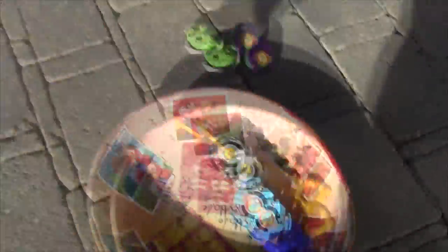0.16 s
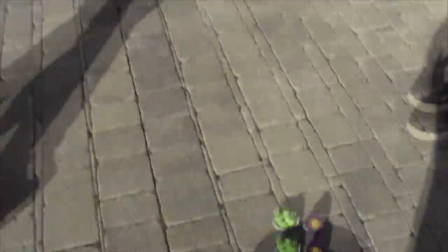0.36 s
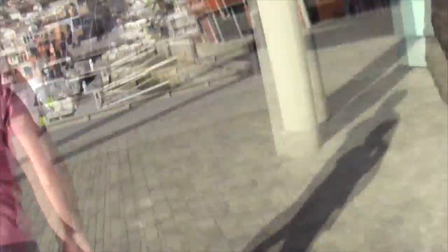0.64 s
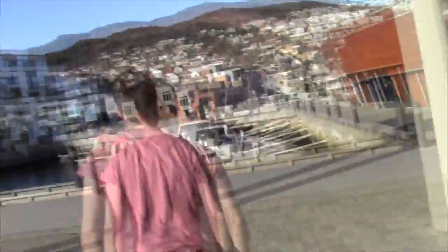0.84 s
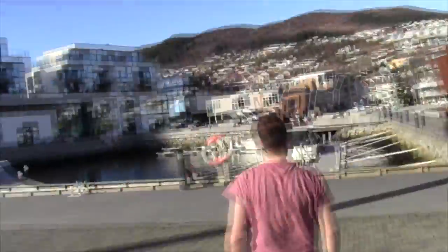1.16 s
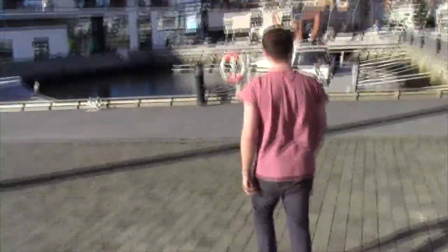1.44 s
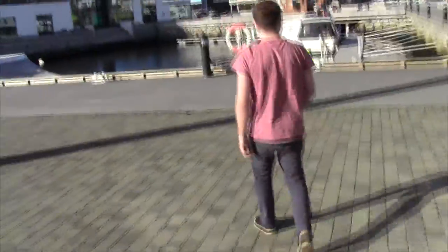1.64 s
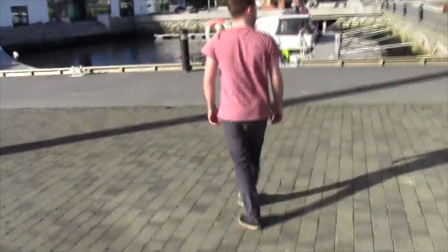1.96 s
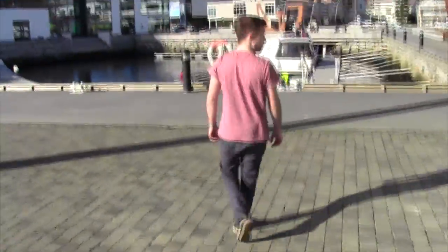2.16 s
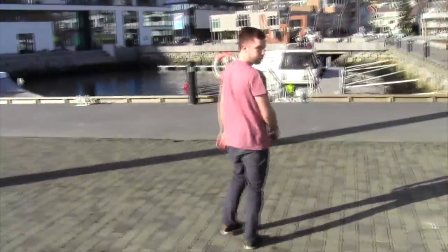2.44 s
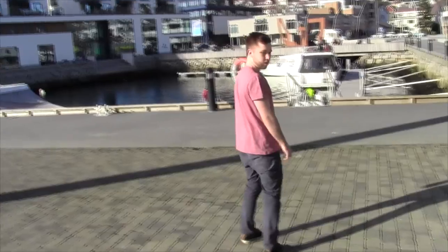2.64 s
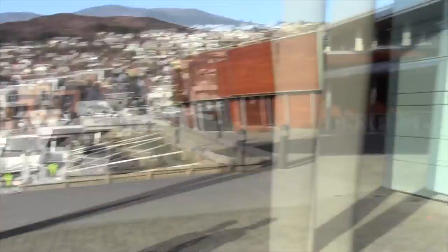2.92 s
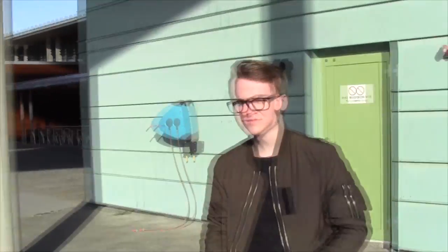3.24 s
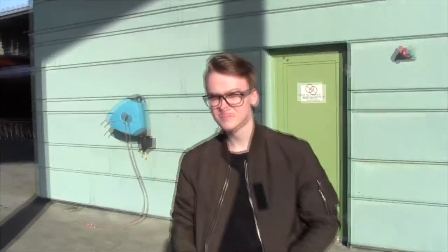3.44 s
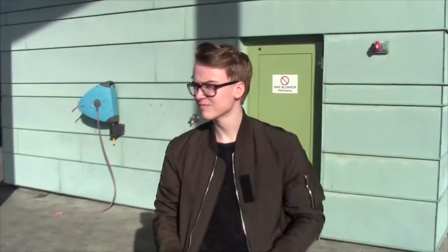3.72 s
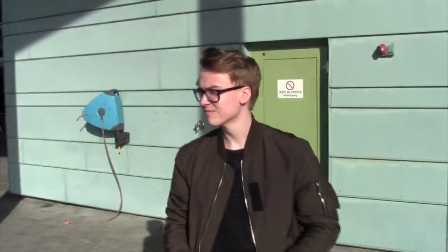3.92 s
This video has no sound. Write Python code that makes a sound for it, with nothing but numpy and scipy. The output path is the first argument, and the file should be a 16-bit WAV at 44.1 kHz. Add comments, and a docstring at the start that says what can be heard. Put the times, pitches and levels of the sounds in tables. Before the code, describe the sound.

Toy spinning tops of metal and plastic clack and scrape in a hollow plastic bowl, ending in a few knocks. Wind buffets the hand-held microphone while a sleeve rustles and shoes scuff the paving, then the wind cuts off abruptly. After a lull the tops slide and rattle again, more softly. Two light taps on the microphone and faint scuffs follow, with a town humming far off.

```python
"""A burst of bright clacks: metal-and-plastic spinning tops slide and collide in a hollow plastic bowl
carried past a hand-held camera on a quay. Impacts and friction excite the modes of the bowl and of the
tops' discs; two seconds in, the bowl, held in a new grip, rattles again. Wind buffets the two microphone
ports and a sleeve rustles while the camera swings. The bowl thuds, then fingers tap the camera;
shoes scuff the paving, and a town hums far off."""
import sys
import numpy as np
from scipy import signal
from scipy.fft import rfft, irfft, next_fast_len
from scipy.io import wavfile
from scipy.ndimage import map_coordinates

SR = 44100
rng = np.random.default_rng(int(sys.argv[2]) if len(sys.argv) > 2 else 0)


def inscribe(sig):
    """Save sig as 16-bit PCM at rate SR to the path in sys.argv[1].

    A 1-D sig is mono; a 2-D sig holds one channel per row.
    Samples are clipped to [-1, 1] before scaling.
    """
    pcm = np.round(np.clip(np.atleast_2d(sig).T, -1, 1) * 32767)
    wavfile.write(sys.argv[1], SR, pcm.astype(np.int16))


N = 180192

# Noise spectra: frequency_hz, relative_density_db
TOWN_SPECTRUM = [(25, 4), (43, -16.5), (111, -14.5), (134, -9.5), (258, -9.5), (685, -0.5), (828, -1.5),
                 (1000, 1.5), (1310, -2.5), (9510, -38), (14700, -59), (16400, -61)]  # far traffic
WIND_SPECTRUM = [(15, -54), (25, -18), (69, -5), (161, -2.5), (306, -8), (345, -14), (381, -10),
                 (866, -18.5), (3000, -38), (3900, -65), (6600, -120)]  # turbulence at the ports
CLOTH_SPECTRUM = [(700, -4), (1500, -4.5), (3000, -2.5), (4500, -8), (11000, -17.5), (16000, -43)]  # a rubbing sleeve
SOLE_SPECTRUM = [(250, -33), (1060, 3.5), (1800, 0.5), (2140, -1.5), (3480, -1.5), (6410, -8), (9500, -12),
                 (16000, -31)]  # a sole on stone
RATTLE_SPECTRUM = [(1470, -46), (2500, 1.5), (3680, 2), (4990, -6), (9220, -6.5), (11800, -15.5),
                   (15400, -31), (16400, -75.5)]  # metal contacts, before the discs colour them
HISS_SPECTRUM = [(1760, -31), (3000, -20), (3580, -7), (3900, -8.5), (6460, -1.5), (9750, -5.5),
                 (14900, -15), (16400, -33)]  # self-noise of each capsule
# Likeness of the sound at the two ports: frequency_hz, coherence
TOWN_COHERENCE = [(60, 1), (3000, 1), (15000, 1)]
WIND_COHERENCE = [(45, 1), (75, 1), (130, 0.99), (290, 0.66), (700, 0.4), (3000, 0.11)]
# Background hum, louder at first while the camera is handled: time_s, level_db
HUM_LEVELS = [(0.0, -38.5), (0.45, -39.5), (0.95, -41), (1.15, -43.5), (1.55, -46), (2.74, -46.5),
              (3.0, -46), (3.47, -47), (4.09, -44.5)]
# Wind buffeting, cut off abruptly at 1.18 s by the wind filter: time_s, level_db
BUFFET_LEVELS = [(0.0, -42), (0.122, -55), (0.284, -41.5), (0.41, -32), (0.456, -43), (0.706, -39.5),
                 (0.74, -34), (0.854, -34), (0.9, -32), (0.97, -30.5), (1.116, -35.5), (1.155, -36),
                 (1.18, -61)]
# Single strong eddies: time_s, level_db, pitch_hz, half_length_s
EDDIES = [(0.42, -54, 237, 0.006), (0.804, -23, 99, 0.0073), (0.82, -19.5, 178, 0.0052),
          (0.869, -13, 176, 0.01), (0.889, -15, 300, 0.0075), (0.896, -16.5, 118, 0.0047),
          (0.922, -19.5, 95, 0.0094), (0.934, -12.5, 184, 0.0045), (0.979, -24, 220, 0.0057),
          (1.008, -18.5, 152, 0.0088), (1.047, -30, 95.5, 0.0059), (1.107, -20.5, 196, 0.0082),
          (1.117, -26.5, 79.6, 0.01)]
# Shoe scuffs: start_s, length_s, level_db
SCUFFS = [(0.475, 0.041, -32), (0.644, 0.026, -48), (0.727, 0.032, -33.5), (0.876, 0.15, -63),
          (1.023, 0.082, -51), (1.298, 0.016, -50), (1.395, 0.088, -53.5), (1.6, 0.059, -56),
          (1.677, 0.25, -56.5), (3.344, 0.068, -48), (3.467, 0.034, -56.5), (3.909, 0.061, -47)]
# Short knocks and thuds, first the bowl's low thud under its clacks, then taps on the camera:
# start_s, level_db, pitch_hz, half_contact_ms, thud_relative_db, thud_t60_s, crack_relative_db
KNOCKS = [(0.203, -29, 2010, 0.69, 7, 0.29, -30), (0.218, -23, 2000, 0.88, 9.5, 0.045, -30),
          (0.304, -16, 790, 1.01, 1.5, 0.014, -25), (0.3808, -12, 1120, 0.59, -15, 0.03, -5),
          (0.383, -13, 420, 2.2, -15, 0.045, -18), (0.3965, -13.5, 1990, 0.9, -5, 0.023, -7),
          (0.409, -24, 1690, 0.45, -20, 0.02, -10), (0.7337, -10, 1020, 1.2, -1.5, 0.021, 6.5),
          (0.7462, -12, 1180, 1.33, -8, 0.021, -23), (0.7478, -13.5, 2830, 0.64, -23, 0.025, 2),
          (0.7542, -18, 900, 0.37, -23, 0.02, -3), (0.7655, -25, 834, 1.67, -23, 0.02, -16),
          (0.913, -29, 3030, 0.69, -22, 0.02, -3), (0.97, -13.5, 1740, 0.83, -1.5, 0.0061, -5),
          (3.3919, -18, 1430, 0.57, -20, 0.04, -7), (3.686, -27, 1360, 0.63, -25, 0.02, -25.5)]
# Acoustic shadow of the camera, before BEARING_DB is added: frequency_hz, side_over_mid_db
SHADOW = [(400, -51), (1000, -62), (2400, -31.5), (5000, -7.5), (9000, -4.5), (11500, 6.5), (15000, 13)]
# Modes of the bowl: pitch_hz, level_db, t60_s
BELLY_MODES = [(800, -44, 0.0085), (927, -1.5, 0.02)]  # the floor's lowest, damped by a supporting hand
FLOOR_MODES = [(1071, 2.5, 0.029), (1127, -3, 0.077)]
WALL_MODES = [(1540, 3, 0.055), (1605, -11, 0.04), (1700, -16, 0.04)]
# Modes of the stiff rim: pitch_hz, before_regrip_db, after_regrip_db, t60_s
RIM_MODES = [(2035, 7, 5.5, 0.021), (2254, -12.5, 2.5, 0.019), (2665, 0, -16, 0.026), (2950, 0, -7, 0.03),
             (3180, -29, 2.5, 0.033), (3310, -15, -2, 0.019), (3620, -3, -2, 0.028), (4020, -8, -20, 0.04),
             (4510, -7.5, -13, 0.025)]
# Resonances of the tops' metal discs: pitch_hz, bandwidth_hz, level_db
DISC_MODES = [(4020, 52, -22), (4850, 49, 0), (5400, 250, 4.5), (6540, 330, 0), (7500, 600, 0.5),
              (9750, 83, -25), (10970, 350, 5)]
# Spells in which the bowl is moved and the tops slide: start_s, end_s, level_db, slope_db_per_s
SLIDES = [(0, 0.5, -27.5, -94), (2.076, 2.984, -43.5, -4)]
# Impacts in the bowl; landing runs from 0 (floor) to 1 (rim):
# start_s, bowl_db, landing, metal_db, ping_hz, chatter_ms
CLACKS = [(0.001, -17.5, 0.45, -14, 4980, 8.4), (0.014, -17, 0.13, -29, 4000, 6.8),
          (0.0354, 4, 0.71, 0, 3680, 5.7), (0.0464, -4, 0.83, -6, 3640, 9.5),
          (0.054, -33, 0.91, -12, 5070, 6.4), (0.0642, -8, 0.31, -5.5, 8800, 6.2),
          (0.0728, -14, 0.4, -18, 5230, 4.5), (0.0864, -23, 0.69, -31, 3570, 4),
          (0.0952, 2.5, 0.52, -3, 3340, 4.2), (0.1146, -47, 0.67, -28, 3730, 3.4),
          (0.1267, -8.5, 0.27, -6.5, 8800, 7.9), (0.1358, -16, 0.35, -10, 4500, 4.3),
          (0.1486, -28, 1, -14, 3700, 5), (0.1582, -47, 0.54, -7.5, 8700, 2.3),
          (0.1702, -23, 0.75, -16, 4800, 6.5), (0.1765, -3, 0.32, -6, 3160, 5.7),
          (0.185, -13, 0.49, -12, 9200, 3), (0.188, -25, 0.54, -7.5, 7940, 6.5),
          (0.198, -10, 0.15, -37, 9130, 3.6), (0.204, -32, 0.38, -10, 10000, 2),
          (0.2069, -4.5, 0.59, -7, 5930, 5.5), (0.2158, -7.5, 0.67, -5, 3340, 3.4),
          (0.2224, -9.5, 0.26, -12, 7100, 6.2), (0.227, -15.5, 0.7, -3.5, 7640, 8.5),
          (0.2348, -6.5, 0.58, -1, 3760, 2.4), (0.2391, -2, 0.3, -6, 4640, 4.2),
          (0.2453, -14, 0.19, -11, 8260, 3.8), (0.265, -39, 0.68, -15, 9000, 5.2),
          (0.2861, -23, 0.4, -19.5, 3900, 9.7), (0.2982, -45, 0.65, -20, 9000, 1.9),
          (0.3058, -10, 0.61, 2, 6290, 3.1), (0.313, -21.5, 0.5, -13, 4070, 4.2),
          (0.33, -19, 0.6, -32, 3680, 4.8), (0.348, -21, 0.48, -27.5, 6200, 12),
          (0.3674, -28, 0.82, -17.5, 3900, 1.7), (0.374, -21.5, 0.51, -19, 4060, 1.8),
          (0.388, -22, 1, -24.5, 6240, 17), (0.4096, -31, 0.45, -23, 8470, 8.8),
          (0.587, -24, 0.39, -55, 4070, 4.5), (2.0821, -26, 0.47, -19.5, 6100, 6.9),
          (2.098, -30, 0.8, -23.5, 5600, 4.9), (2.1256, -28, 0.39, -24, 3380, 7.8),
          (2.1473, -38, 0.35, -23.5, 3450, 5.7), (2.162, -46, 0.65, -20, 3350, 6.7),
          (2.1929, -32, 0.33, -21.5, 6100, 7.7), (2.206, -24, 0.5, -24, 3500, 13),
          (2.2396, -30, 0.67, -27, 3560, 5.8), (2.253, -37, 0.99, -31.5, 6000, 11),
          (2.298, -52, 0.91, -34, 6000, 6.4), (2.3147, -23, 0.77, -25, 5700, 5.8),
          (2.348, -35, 0.52, -22.5, 5950, 6.7), (2.3666, -18, 0.45, -35, 5750, 3.4),
          (2.374, -32, 0.28, -35, 5500, 4.2), (2.438, -42, 0.47, -42, 5800, 4),
          (2.4509, -33, 1, -19, 5550, 3.9), (2.4638, -8, 0.583, -14, 5700, 3.8),
          (2.4741, -26, 0.35, -44, 8710, 3), (2.49, -28, 0.34, -31, 3570, 6.3),
          (2.5017, -23, 0.55, -30, 3380, 6.8), (2.5085, -12, 0.39, -11.5, 4440, 3.4),
          (2.537, -17, 0.41, -29, 3370, 5.9), (2.5471, -21.5, 0.25, -35.5, 9100, 9.9),
          (2.5645, -17, 0.4, -24.5, 3820, 6.8), (2.574, -24.5, 0.23, -36, 3400, 5.6),
          (2.5825, -20.5, 0.51, -32, 4260, 9.2), (2.6203, -27, 0.26, -29.5, 4430, 5),
          (2.709, -30, 0.21, -24, 6860, 4.9), (2.7188, -21, 0.69, -17, 5040, 5.6),
          (2.7227, -28, 0.79, -31, 8100, 5), (2.729, -30, 0.49, -32, 5870, 4),
          (2.741, -48, 0.42, -44, 12000, 3.4), (2.757, -30, 0.71, -30, 3650, 6),
          (2.7694, -8, 0.47, -26.5, 6040, 3.9), (2.7787, -26.5, 0.79, -30, 6400, 2.5),
          (2.7915, -16.5, 0.44, -25, 3200, 2.9), (2.8097, -10.5, 0.75, -13.5, 4520, 0.7),
          (2.816, -18.5, 0.45, -29, 3260, 4.1), (2.8281, -21, 0.38, -30, 6400, 4.6),
          (2.84, -19.5, 0.45, -28, 3460, 8), (2.857, -21, 0.46, -36, 3340, 6.1),
          (2.873, -30, 0.33, -33, 3260, 5), (2.891, -31, 0.96, -28, 3600, 5.7),
          (2.9123, -23, 0.7, -32, 5030, 1.9), (2.978, -25.5, 0.67, -23, 9270, 0.84)]

REGRIP_S = 1.5  # the bowl is regripped and carried to one side; the pairs below are (before, after)
BEARING_DB = (-11, -3)  # strength of the shadow
BELLY_DB, FLOOR_DB, WALL_DB = (8, -33), (-9, 5.5), (-1, 5)  # weights of the struck modes
WALL_T60_SHARE = (0.9, 0.58)  # ring time that the grip leaves
RUB_WALL_DB, TIP_GRIND_DB = (-14, -5), (-14.5, -16)  # relative to the rubbed floor
SKID_DB = (-39, -30)  # relative to a clack's metal_db


def amp(db):
    """Amplitude ratio of a level in decibels."""
    return 10 ** (np.asarray(db) / 20)


def unit_rms(x):
    """Normalisation to an rms of 1."""
    return x / np.sqrt(np.mean(x ** 2) + 1e-20)


def curve_at(points, hz):
    """Interpolation of (frequency_hz, value) points on a logarithmic frequency axis."""
    frequencies, values = np.transpose(points)
    return np.interp(np.log(hz + 1), np.log(frequencies + 1), values)


def envelope(points):
    """Amplitude envelope through (time_s, level_db) points, silent outside them."""
    return amp(np.interp(np.arange(N) / SR, *np.transpose(points), -120, -120))


def wobble(rate_hz):
    """Smooth random modulation: a spline through rate_hz Gaussian values a second."""
    knots = rng.standard_normal(int(N * rate_hz / SR) + 4)
    return map_coordinates(knots, [np.arange(N) * rate_hz / SR])


def filtered(x, response):
    """Linear filtering: the spectrum is multiplied by a frequency response."""
    size = next_fast_len(N + 8192)
    return irfft(rfft(x, size) * response(np.fft.rfftfreq(size, 1 / SR)), size)[..., :N]


def stereo_noise(spectrum, coherence):
    """Partial coherence: the balance of independent mid and side noise sets how alike the ports are."""
    def mid_and_side(hz):
        angle = np.arccos(np.clip(curve_at(coherence, hz), -1, 1)) / 2
        return amp(curve_at(spectrum, hz)) * [np.cos(angle), np.sin(angle)]
    mid, side = filtered(rng.standard_normal((2, N)), mid_and_side)
    return unit_rms(np.array([mid + side, mid - side]))


def ring(modes, t, spread_db, rise_s):
    """Free vibration: a sum of damped sines, varying a little in level and pitch from blow to blow."""
    hz, db, t60 = np.transpose(modes)[..., None]
    level_draw, pitch_draw = rng.standard_normal((2, len(modes), 1))
    decay = amp(db + spread_db * level_draw - 60 * t / t60)
    tones = decay * np.sin(2 * np.pi * hz * (1 + 0.0068 * pitch_draw) * t)
    return tones.sum(axis=0) * (1 - np.exp(-t / rise_s))


def town():
    """Incoherent summation: far traffic merges into a drifting hum, here without its deepest bass."""
    hum = envelope(HUM_LEVELS) * amp(1.29 * wobble(6.634)) * stereo_noise(TOWN_SPECTRUM, TOWN_COHERENCE)
    return filtered(hum, lambda hz: hz ** 4 / (hz ** 4 + 62 ** 4))


def wind():
    """Turbulence: pressure arrives at the ports in lumps, and strong eddies swing it for a few cycles."""
    t = np.arange(N) / SR
    lumps = amp(2.3 * wobble(30.8) + 4.7 * np.array([wobble(40.33), wobble(39.54)]))
    buffet = envelope(BUFFET_LEVELS) * unit_rms(lumps * stereo_noise(WIND_SPECTRUM, WIND_COHERENCE))
    lead_s = np.array([[0.001], [-0.001]])  # an eddy's swing is early at one port, late at the other
    for time_s, level_db, pitch_hz, half_length_s in EDDIES:
        swell = np.exp(-((t - time_s - 0.008) / half_length_s) ** 2)
        phase = 2 * np.pi * pitch_hz * (t - time_s + lead_s) + rng.uniform(0, 2 * np.pi)
        buffet += amp(level_db) * swell * np.sin(phase)
    return buffet


def low_cut_settling(start_s=1.16, level_db=-52, pitch_hz=20, t60_s=0.7):
    """Transient response: the recorder's low-cut filter settles faintly as the buffeting stops."""
    elapsed_s = np.clip(np.arange(N) / SR - start_s, 0, None)
    return amp(level_db - 60 * elapsed_s / t60_s) * np.sin(2 * np.pi * pitch_hz * elapsed_s)


def sleeve(level_db=-49.5, swing_end_s=1.0, t60_s=1):
    """Cloth friction: spiky grains of dry hiss die away once the camera stops swinging."""
    resting_s = np.clip(np.arange(N) / SR - swing_end_s, 0, None)
    grains = unit_rms(amp(3 * wobble(250)) * stereo_noise(CLOTH_SPECTRUM, [(2000, 0.94), (12000, 0.94)]))
    return amp(level_db + 0.57 * wobble(7.3) - 60 * resting_s / t60_s) * grains


def shoes():
    """Sliding friction: a sole dragged over rough stone gives a grainy hiss that swells and stops."""
    t = np.arange(N) / SR
    strokes = sum(amp(level_db) * np.sin(np.pi * np.clip((t - start_s) / length_s, 0, 1)) ** 0.65
                  for start_s, length_s, level_db in SCUFFS)
    grit = amp(2.4 * wobble(620)) * stereo_noise(SOLE_SPECTRUM, [(2000, 1.0), (14000, 0.93)])
    return strokes * unit_rms(grit)


def knocks_and_thuds():
    """Impulse response: a briefly forced shell, first the bowl and later the camera, thuds and cracks."""
    out, t = np.zeros(N + SR), np.arange(SR // 16) / SR
    crack_modes = [(1830, -0.5, 0.0068), (2200, 0.5, 0.0066), (2960, -2.5, 0.0057), (3260, 1.5, 0.0046)]
    for start_s, level_db, pitch_hz, half_contact_ms, thud_db, thud_t60_s, crack_db in KNOCKS:
        at, half_s = round((start_s + 0.0015) * SR), half_contact_ms / 1000
        contact = np.exp(-((t - half_s) / half_s) ** 2) * (1 - np.exp(-t / 0.0003))
        offset = np.exp(-(np.pi * pitch_hz * half_s) ** 2)  # keeps the pulse's mean near zero
        tap = -contact * (np.cos(2 * np.pi * pitch_hz * (t - half_s)) - offset)
        crack = amp(crack_db) * ring(crack_modes, t, spread_db=2, rise_s=0.00069)
        thud_modes = [(362.3, 1, thud_t60_s), (222, -17.5, 0.023), (513, 0, 0.011)]
        thud = amp(thud_db) * ring(thud_modes, t, spread_db=2.5, rise_s=0.00097)
        out[at:at + len(t)] += amp(level_db) * (tap + thud + crack)
    return filtered(out[:N], lambda hz: 1 / (1 + 1j * hz / 5500) ** 2)  # dulls the treble


def reflections(x, t60_s=0.43, corner_hz=2500):
    """Reverberation: the paving and a wall return two independent dull tails, one mid and one side."""
    t = np.arange(SR // 4) / SR
    tails = rng.standard_normal((2, len(t))) * amp(-60 * t / t60_s) * (t > 0.003)
    dull = filtered(x, lambda hz: 1 / (1 + 1j * hz / corner_hz) ** 2)
    return signal.fftconvolve(dull[None], tails / np.linalg.norm(tails[0]), axes=1)[:, :N]


def camera_shadow(x):
    """Diffraction: long waves from off the axis reach both ports alike, while short waves differ."""
    bearing = amp(np.where(np.arange(N) / SR < REGRIP_S, *BEARING_DB))
    side = bearing * filtered(x, lambda hz: amp(curve_at(SHADOW, hz)) * np.exp(-1.45j))
    return np.array([x + side, x - side])


def rim_modes(grip):
    """Boundary conditions: the grip (0 first, 1 second) sets the level of each rim mode."""
    return [(pitch_hz, levels_db[grip], t60_s) for pitch_hz, *levels_db, t60_s in RIM_MODES]


def disc_rattle():
    """Resonance: the metal discs raise peaks in bright contact noise."""
    def response(hz):
        peaks = sum(amp(level_db - 0.5) * width_hz / np.hypot(2 * (hz - pitch_hz), width_hz)
                    for pitch_hz, width_hz, level_db in DISC_MODES)
        return amp(curve_at(RATTLE_SPECTRUM, hz)) * (1 + peaks)
    return unit_rms(filtered(rng.standard_normal(N), response))


def rubbed(modes, roughness, corner_hz=5000):
    """Forced vibration: uneven friction noise drives a bank of damped resonators."""
    def response(hz):
        peaks = sum(amp(level_db) / (5 / t60_s + 2j * (hz - pitch_hz))
                    for pitch_hz, level_db, t60_s in modes)
        return peaks / (1 + (hz / corner_hz) ** 4)
    return unit_rms(filtered(roughness * rng.standard_normal(N), response))


def sliding_tops(ramp_s=0.059, skid_t60_s=0.089):
    """Frictional excitation: dragging tips drive the bowl's modes; a top skids thinly after each clack."""
    t = np.arange(N) / SR
    first_grip = t < REGRIP_S
    drag, skid = np.zeros((2, N))
    for start_s, end_s, level_db, slope_db_per_s in SLIDES:
        onset = np.clip((t - start_s) / ramp_s, 0, 1) if start_s > 0 else 1
        release = np.clip((end_s - t) / ramp_s, 0, 1)
        drag += amp(level_db + slope_db_per_s * (t - start_s)) * onset * release
    for start_s, _, _, metal_db, *_ in CLACKS:
        decay = amp(-60 * np.abs(t - start_s) / skid_t60_s) * (t > start_s)
        skid += amp(metal_db + SKID_DB[int(start_s > REGRIP_S)]) * decay
    roughness = amp(4.6 * wobble(160))
    floor = rubbed(FLOOR_MODES, roughness)
    wall = amp(np.where(first_grip, *RUB_WALL_DB)) * rubbed(WALL_MODES, roughness)
    rim = amp(-4) * np.where(first_grip, rubbed(rim_modes(0), roughness), rubbed(rim_modes(1), roughness))
    scrape = unit_rms(roughness * disc_rattle())
    grind = amp(np.where(first_grip, *TIP_GRIND_DB)) * scrape
    return drag * (floor + wall + rim + grind) + skid * scrape


def struck_bowl(landing, grip, t, floor_hz=800, rim_hz=3600, falloff_db=153):
    """Modal excitation: a blow on the floor favours the low modes, a blow on the rim the high ones."""
    wall_modes = [(hz, db, t60_s * WALL_T60_SHARE[grip]) for hz, db, t60_s in WALL_MODES]
    # Every blow reaches the floor and the wall at least as well as least_db.
    parts = [(BELLY_MODES, BELLY_DB[grip], -15), (FLOOR_MODES, FLOOR_DB[grip], -15),
             (wall_modes, WALL_DB[grip], -8.5), (rim_modes(grip), 0, -np.inf)]
    pitch_hz, level_db, t60_s, least_db = np.transpose(
        [(hz, db + grip_db, t60, least) for modes, grip_db, least in parts for hz, db, t60 in modes])
    place = np.log(pitch_hz / floor_hz) / np.log(rim_hz / floor_hz)
    level_db += np.maximum(-falloff_db * (place - landing) ** 2, least_db)
    level_db -= 20 * np.log10(np.linalg.norm(amp(level_db)))  # the modes share unit power
    body = ring(np.transpose([pitch_hz, level_db, t60_s]), t, spread_db=2.5, rise_s=0.0014)
    smack_hz = floor_hz * (rim_hz / floor_hz) ** landing
    smack = amp(-2) * ring([(smack_hz, 0, 0.008)], t, spread_db=1.5, rise_s=0.0003)
    return body + smack


def clacking_tops():
    """Impact excitation: each contact rings the bowl, pings a disc and shakes the top's loose parts."""
    out, t = np.zeros(N + SR), np.arange(SR // 10) / SR
    rattle = disc_rattle()
    for start_s, bowl_db, landing, metal_db, ping_hz, chatter_ms in CLACKS:
        at = round((start_s + 0.0003) * SR)
        end = at + len(t)
        bowl = struck_bowl(landing, int(start_s > REGRIP_S), t)
        ping_modes = [(ping_hz, 0, 0.009), (1.08 * ping_hz, -4, 0.007)]
        ping = amp(-4.5) * ring(ping_modes, t, spread_db=1.5, rise_s=0.00051)
        shaking = np.exp(-(1000 * t / chatter_ms) ** 1.3) * (1 - np.exp(-t / 0.00035))
        chatter = amp(-15.5) * shaking * rattle[at:end]
        # the first instant of metal on metal
        snap = amp(-6.5 - 60 * t / 0.004) * (1 - np.exp(-t / 0.0005)) * rattle[end:end + len(t)]
        out[at:end] += amp(bowl_db) * bowl + amp(metal_db) * (ping + chatter + snap)
    return out[:N]


def scene():
    """Superposition: the direct sounds and the faint reflections add at the two ports."""
    sources = np.array([clacking_tops() + sliding_tops(), knocks_and_thuds()])
    # A low cut thins the bass of the clacks and knocks.
    bowl, knocks = filtered(sources, lambda hz: (1j * hz / (110 + 1j * hz)) ** 2)
    tail_mid, tail_side = reflections(bowl + knocks)
    off_axis = camera_shadow(bowl + amp(-9.5) * tail_mid)
    width = amp(-60) * tail_side * [[1], [-1]]
    return off_axis + width + knocks + shoes() + sleeve() + wind() + low_cut_settling() + town()


def record(dry, band_limit_hz=16500):
    """Transduction: the capsules add self-noise, peaks saturate softly and the band is limited."""
    noisy = dry + amp(-69) * stereo_noise(HISS_SPECTRUM, [(1000, 0.018)])
    saturated = noisy / (1 + np.abs(noisy) ** 12) ** (1 / 12)
    return filtered(saturated, lambda hz: hz < band_limit_hz)


dry = scene()
out = record(dry)
inscribe(out)
```